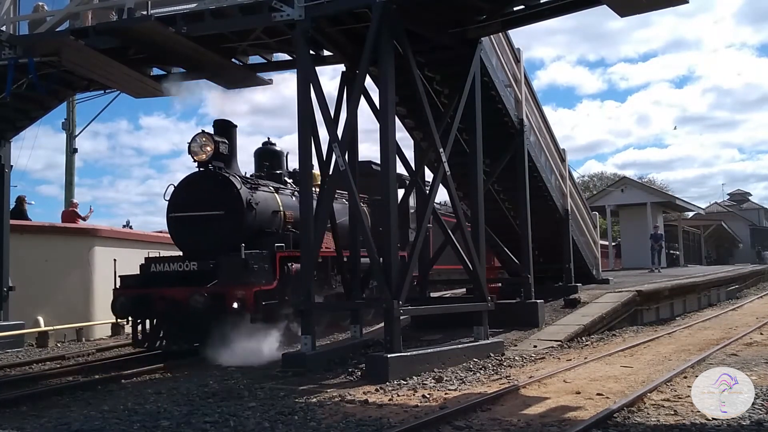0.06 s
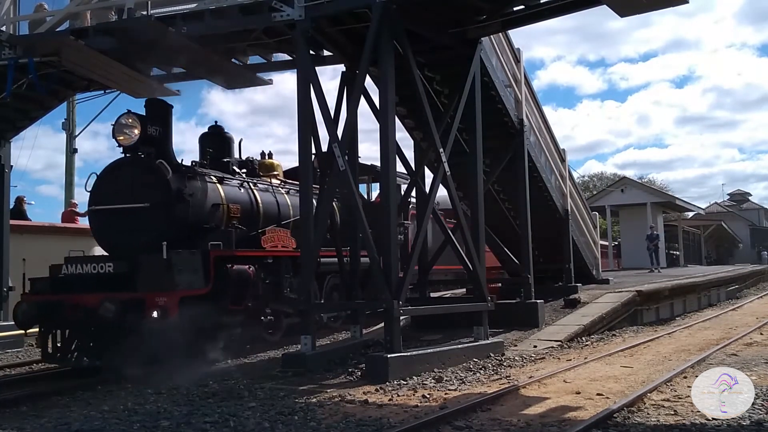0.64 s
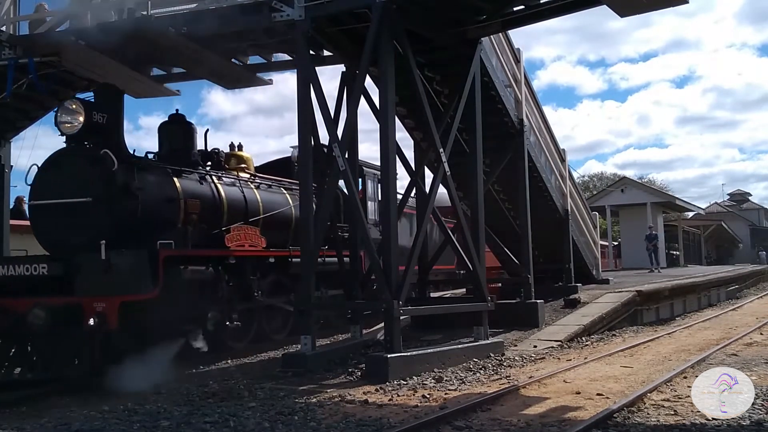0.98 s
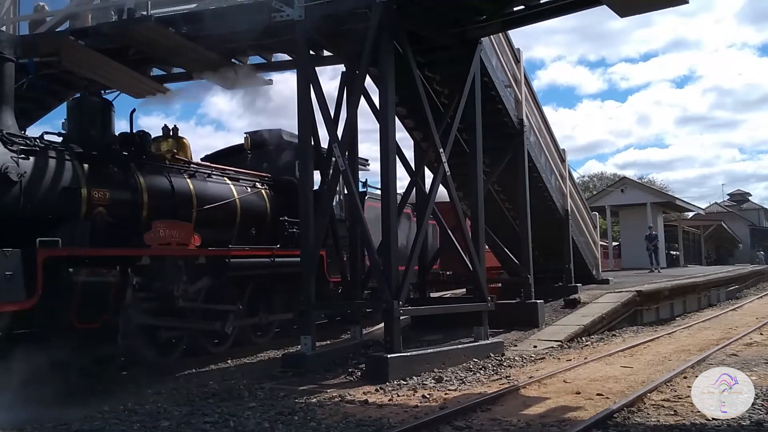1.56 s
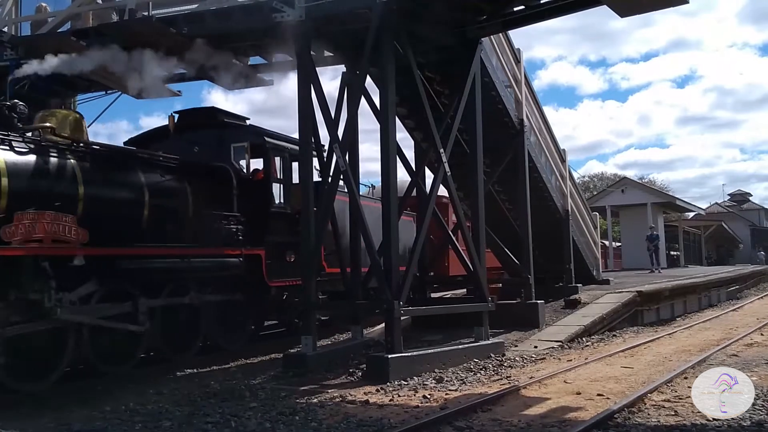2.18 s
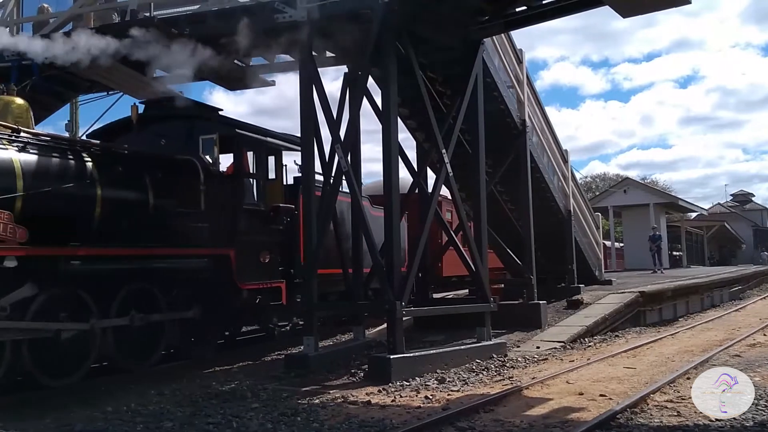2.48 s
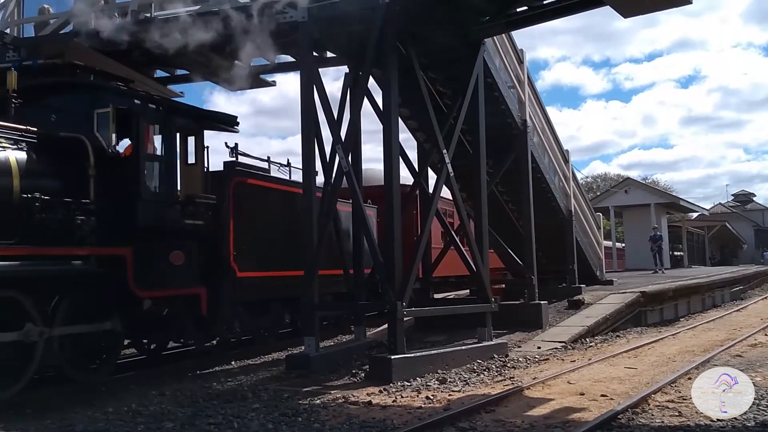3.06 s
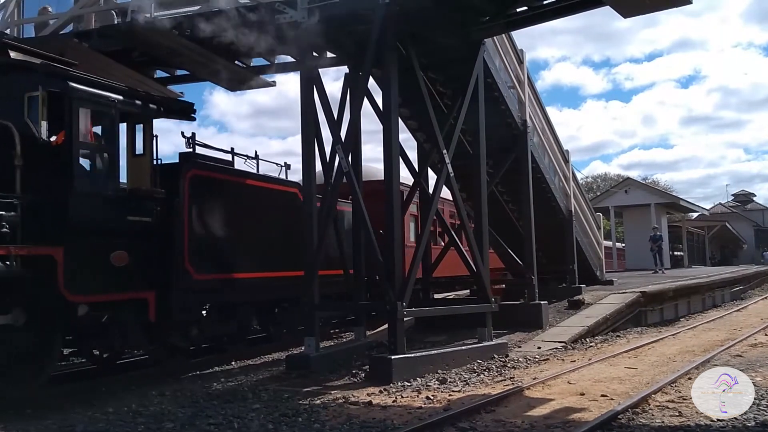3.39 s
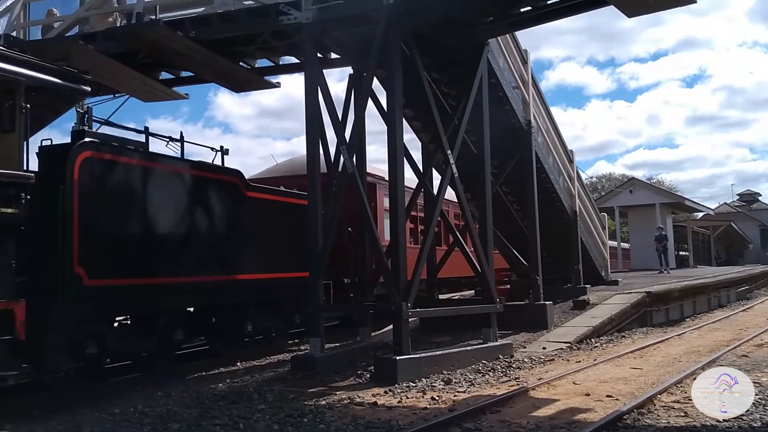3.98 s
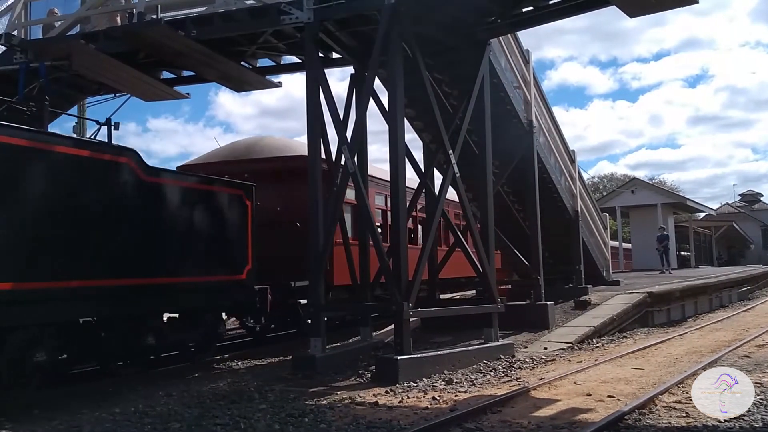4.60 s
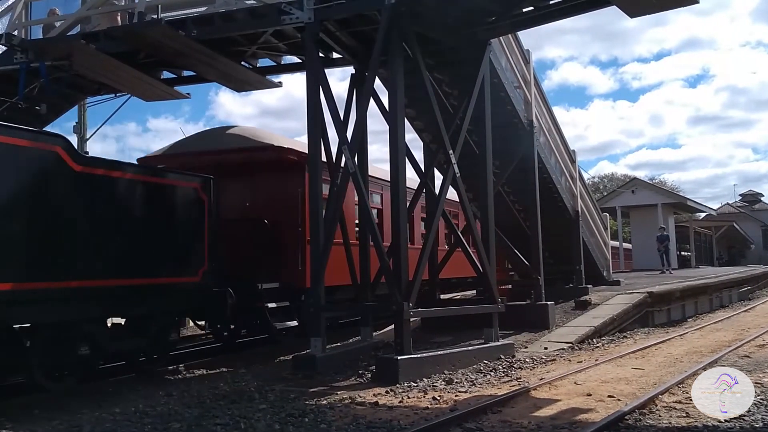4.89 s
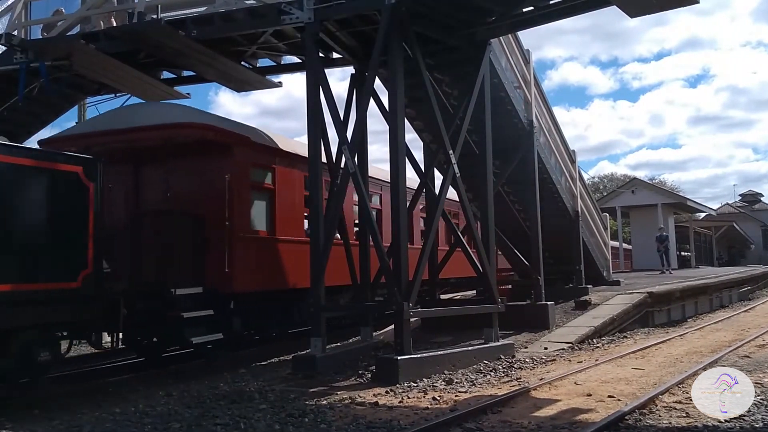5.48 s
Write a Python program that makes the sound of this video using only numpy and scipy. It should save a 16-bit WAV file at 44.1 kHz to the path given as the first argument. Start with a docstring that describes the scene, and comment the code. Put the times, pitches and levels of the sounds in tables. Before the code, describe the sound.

A steam locomotive passes close by, chuffing rhythmically with loud blasts of hissing steam, rumbling wheels and a thin high whine.

```python
"""A railway station: a steam locomotive pulls out with its carriages, passing close by.
Exhaust chuffs and hoots in the chimney four times a wheel turn; once a turn an open cylinder
drain blasts steam. The wheels rumble louder as they near and ring faintly, the turbo-generator's
whine sinks as it passes, and slack rods knock and clank. A footbridge adds a short tail to
blasts, chuffs and knocks; gain control ducks the loudest moments."""
import sys
import numpy as np
from scipy import signal
from scipy.fft import rfft, irfft, next_fast_len
from scipy.io import wavfile
from scipy.ndimage import uniform_filter1d

SR = 44100
rng = np.random.default_rng(int(sys.argv[2]) if len(sys.argv) > 2 else 0)


def bounce(signal):
    """Save signal as a 16-bit WAV file at the path given by the first command-line argument."""
    frames = np.transpose(np.atleast_2d(signal))
    limited = np.clip(frames, -1, 1)
    pcm = np.round(limited * 32767).astype(np.int16)
    wavfile.write(sys.argv[1], SR, pcm)


N = 244314
TIME = np.arange(N) / SR
EDGE_HZ = 14290
# drain blasts, one per wheel turn: level/dB, lead steam/dB, fizz/dB, fizz tilt/dB,
# ring f/Hz, ring width/Hz, ring gain/dB, hump f/Hz, dip f/Hz
BLASTS = [(-26.5, -13, -11, -3, 4760, 530, 6.5, 6400, 9100),
          (-21, -16, -10, 0.5, 4480, 470, 10, 5600, 3200), (-19.5, -16, -7, -5.5, 4460, 340, 7, 6500, 5300),
          (-18.5, -14.5, -10, -2.5, 4430, 260, 8.5, 3750, 5800),
          (-18.5, -13.5, -8.5, 5, 3520, 940, 1.5, 5940, 9300),
          (-23, -11.5, -8.5, 4, 2770, 230, 2, 5760, 8700)]


def amp(db):
    return 10 ** (np.asarray(db) / 20)


def unit_rms(x):
    return x / np.sqrt(np.mean(abs(x) ** 2) + 1e-20)


def bell(hz, centre_hz, width_hz):
    return np.exp(-((hz - centre_hz) / width_hz) ** 2)


def spectrum_db(points, hz):
    """Interpolate on a log-frequency axis."""
    f, db = np.transpose(points)
    return np.interp(np.log(hz + 1), np.log(f), db)


def follow(rows, t):
    """Table columns interpolated at times t."""
    times, *columns = np.transpose(rows)
    return [np.interp(t, times, column) for column in columns]


def add(mix, start_s, sound):
    part = mix[max(round(start_s * SR), 0):][:len(sound)]
    part += sound[:len(part)]


def noise(points, size):
    """Shaped noise, rms 1."""
    full = next_fast_len(size)
    shape = amp(spectrum_db(points, np.fft.rfftfreq(full, 1 / SR)))
    return unit_rms(irfft(rfft(rng.standard_normal(full)) * shape, full)[:size])


def drift(rate_hz, size=N):
    """Smooth random motion, rms 1."""
    full = next_fast_len(size)
    hz = np.fft.rfftfreq(full, 1 / SR)
    lowpass = np.exp(-(hz / rate_hz) ** 2) * (hz > 0)
    return unit_rms(irfft(rfft(rng.standard_normal(full)) * lowpass, full)[:size])


def crank_time(turns, start_s=-.185, turns_per_s=.8746, turns_per_s2=.0186):
    """Time at which the accelerating wheels reach a turn count."""
    return start_s + (np.sqrt(turns_per_s ** 2 + 2 * turns_per_s2 * turns) - turns_per_s) / turns_per_s2


def gone_by(t, pass_s=2.7, width_s=0.25):
    """0 as the cylinder approaches, 1 once past."""
    return .5 + .5 * np.tanh((t - pass_s) / width_s)


def pressure_db(t, turn, lead_db, lead_s=0.068, crack_s=0.043, open_s=0.015, vent_s=0.045, linger_s=0.18):
    """The valve cracks to admit lead steam and opens wide; the steam expands and is released."""
    opens, sags, release = (crank_time(turn + angle) for angle in (0, 0.31, 0.42))
    curve = [(opens - 2 * (lead_s + crack_s), -90), (opens - lead_s - crack_s, lead_db - 21.5),
             (opens - lead_s, lead_db), (opens - open_s, lead_db), (opens + open_s, 0), (sags, 0),
             (release, -10), (release + vent_s, -26), (release + vent_s + linger_s, -55)]
    return np.interp(t, *np.transpose(curve), right=-120)


def blast(turn, row, comb_hz=725, sputter_db=-0.13, sputter_hz=170):
    """Wet steam sputters through the drain cock, whose bore rings. Returns start time and sound."""
    # steam jet spectrum: f/Hz, density/dB
    jet_spectrum = [(250, -30), (850, -11.5), (1120, -2.5), (1450, 1.5), (2200, 2.46), (3000, 3.5),
                    (4100, 4.5), (5100, 0.5), (6300, 2.5), (7500, 1.5), (8800, -7), (10500, -13.5),
                    (14000, -16)]
    level_db, lead_db, fizz_db, tilt_db, ring_hz, ring_width_hz, ring_db, hump_hz, dip_hz = row
    opens_s = crank_time(turn)
    passed = gone_by(opens_s)
    start_s = max(round(opens_s - .25, 1), 0)
    t, hz = start_s + np.arange(SR) / SR, np.fft.rfftfreq(SR, 1 / SR)
    db = spectrum_db(jet_spectrum, hz) + ring_db * bell(hz, ring_hz, ring_width_hz)
    db += 2.5 * bell(hz, hump_hz, 600) - 2 * bell(hz, dip_hz, 450)
    # once past: less body, more low roar
    db += (2 - 4.5 * passed) * bell(hz, 1830, 500) + 7 * passed * bell(hz, 730, 460)
    db += np.interp(hz, [10000, EDGE_HZ], [0, tilt_db])
    # ground and frame reflections ripple the spectrum
    db += 2 * np.cos(2 * np.pi * hz / comb_hz) * bell(hz, 2 * comb_hz, 3500) * (hz > 1.25 * comb_hz)
    db += .5 * drift(90, len(hz))
    jet = rfft(rng.standard_normal(SR)) * amp(db)
    # fizz is beamed: its share depends on where the jet points
    hiss_rms = np.std(irfft(jet * (hz > 4700) * (hz < 9000)))
    fizz_rms = np.std(irfft(jet * (hz > 10000) * (hz < 14000)))
    crossfade = np.clip((hz - 7700) / 2500, 0, 1)
    steam = irfft(jet * ((1 - crossfade) / hiss_rms + amp(fizz_db) * crossfade / fizz_rms))
    envelope_db = level_db + pressure_db(t, turn, lead_db) + sputter_db * drift(sputter_hz, SR)
    return start_s, steam * amp(envelope_db)


def drain():
    """The open cylinder drain blasts once a turn."""
    out = np.zeros(N)
    for turn, row in enumerate(BLASTS):
        add(out, *blast(turn, row))
    return out


def chuffs(rasp_db=-7, waver_hz=20, flutter_db=2.2):
    """Each exhaust beat swells, holds and dies in the chimney: hollow note, rasp, unsteady hoot."""
    # beats of a turn: crank angle/turns, accent/dB, rise/s, hold/s, rasp/dB, low hoot/dB, high hoot/dB
    beats = [(-.035, 1.5, .022, .034, 4, -1, -2.5), (0.198, -.5, 0.026, 0.031, 4, -5, -10.5),
             (0.436, 0, 0.021, 0.014, 4.5, -1, -13.5), (.698, -1, 0.025, 0.043, -2, -3, -13)]
    # chimney passing by: t/s, level/dB, hollow note/dB, hoot/dB, fall/s
    exhaust = [(0, -31, 2.5, -7, 0.047), (1.6, -27.5, 1.5, -8.5, 0.047), (2.9, -23.5, -3.5, 3, 0.022),
               (3.65, -21.5, 3, -13, 0.021), (4.15, -21.5, 2.5, -7.5, 0.021),
               (5.54, -22.5, -0.5, -3, 0.028)]
    # chimney hoots: f/Hz
    hoots_hz = [283.8, 376]
    # hollow note and rasp spectra: f/Hz, density/dB
    hollow_spectrum = [(60, -50), (110, -8), (141, 9), (205, -12), (275, 2.5), (325, -5.5), (390, -2),
                       (520, -16), (800, -21.5), (2000, -49)]
    rasp_spectrum = [(200, -5), (430, -2), (650, -4), (850, -1), (1200, -6.5), (1550, -2.5), (2300, -10.5),
                     (4500, -16.5), (8000, -29), (14000, -46)]
    hollow_env, rasp_env, low_env, high_env = np.zeros((4, N))
    for turn in range(len(BLASTS)):
        for angle, accent_db, rise_s, hold_s, throat_db, low_db, high_db in beats:
            beat_s = crank_time(turn + angle)
            level_db, hollow_db, hoot_db, fall_s = follow(exhaust, beat_s)
            t = TIME - beat_s
            exponent = np.where(t < 0, (t / rise_s) ** 2, (np.maximum(t - hold_s, 0) / fall_s) ** 1.08)
            beat = amp(level_db + accent_db) * np.exp(-exponent)
            hollow_env += beat * amp(hollow_db)
            rasp_env += beat * amp(throat_db)
            low_env += beat * amp(hoot_db + low_db)
            high_env += beat * amp(hoot_db + high_db)
    phases = [2 * np.pi * np.cumsum(hz + waver_hz * drift(58.8)) / SR for hz in hoots_hz]
    low, high = (unit_rms(np.sin(phase)) for phase in phases)
    hoots = (low_env * low + high_env * high) * amp(flutter_db * drift(46))
    hollow = noise(hollow_spectrum, N)
    hollow /= np.sqrt(uniform_filter1d(hollow ** 2, size=1500) + 1e-3)  # steady push within a beat
    return hollow_env * hollow + amp(rasp_db) * rasp_env * noise(rasp_spectrum, N) + hoots


def rolling(leak_before_db=-48.5, leak_after_db=-43):
    """Wheels rumble, ironwork rattles; the glands leak steam, plainer once the cylinder is past."""
    # tender and carriages nearing: t/s, rumble/dB, clatter/dB
    approach = [(0.0, -37, -48), (0.28, -39, -46.5), (3.07, -33, -38), (3.59, -30.5, -35),
                (5.54, -24.5, -33)]
    # wheel, ironwork and gland spectra: f/Hz, density/dB
    rumble_spectrum = [(20, -42), (38, -32), (56, 1), (72, -11.5), (92, -2), (115, -13.5), (142, -3.5),
                       (190, -12), (300, -16), (600, -45.5), (1500, -53)]
    clatter_spectrum = [(150, 3.5), (300, -5.5), (450, 6), (650, 0), (950, -1), (1280, -2), (1540, 2.5),
                        (1750, -3), (2550, -7.5), (2800, -7), (3150, -10), (3700, -9), (6000, -52)]
    leak_spectrum = [(1500, 12), (3000, -29), (4350, 14), (5000, 4.5), (6400, 4.5), (8500, -2), (11000, -9),
                     (14000, -45)]
    rumble_db, clatter_db = follow(approach, TIME)
    leak_db = leak_before_db + (leak_after_db - leak_before_db) * gone_by(TIME)
    rumble = noise(rumble_spectrum, N) * amp(rumble_db + 1.2 + 1.64 * drift(rate_hz=7.3))
    clatter = noise(clatter_spectrum, N) * amp(clatter_db + 3 + 0.94 * drift(rate_hz=45))
    leak = noise(leak_spectrum, N) * amp(leak_db + .5 * drift(rate_hz=20))
    return rumble + clatter + leak


def generator(blade_hz=4101, shaft_hz=53, waver_hz=2.03, echo_db=-43):
    """Doppler-shifted turbine blade tone with shaft-rate sidebands and scattered echoes."""
    # whine: t/s, blade tone/dB, lower sideband/dB
    whine = [(0, -33.5, -48), (.6, -48, -49), (.9, -37.5, -52), (1.6, -47, -41), (2.55, -39, -44.5),
             (3.1, -42, -39), (3.6, -28.5, -53), (3.92, -40.5, -68), (4.07, -25.5, -57), (5.02, -27.5, -45),
             (5.19, -35, -50), (5.38, -21.5, -48), (5.54, -30.5, -50)]
    speed_m_per_s, sound_m_per_s, distance_m, closest_s = 3.4, 343, 6.5, 4.35
    blade_db, lower_db = follow(whine, TIME)
    ahead_m = speed_m_per_s * (closest_s - TIME)
    hz = blade_hz * (1 + speed_m_per_s / sound_m_per_s * ahead_m / np.hypot(ahead_m, distance_m))
    phase = 2 * np.pi * np.cumsum(hz + waver_hz * drift(8.1)) / SR
    shaft = np.exp(2j * np.pi * shaft_hz * TIME)
    fading = 1 + 0.62 * (drift(2.2) + 1j * drift(8))
    sidebands = (amp(lower_db) / shaft + amp(blade_db - 16) * shaft) * fading
    echoes = amp(echo_db) * unit_rms(drift(45) + 1j * drift(45))
    blade = amp(blade_db + drift(7.3))
    tone = ((blade + sidebands + echoes) * np.exp(1j * phase)).real
    octave = amp(blade_db - 41) * np.cos(2 * phase)
    return np.sqrt(2) * (tone + octave)


def wheel_ring(before_db=-17, after_db=-1, width_hz=9):
    """The rails excite the wheels' modes, plainer once the engine is alongside."""
    # wheel modes: f/Hz, level/dB
    modes = [(1475, -50.5), (1599, -45), (1820, -47), (2842, -52), (2896, -55), (3467, -51), (3580, -58)]
    ring = np.zeros(N)
    for hz, db in modes:
        excitation = drift(width_hz) + 1j * drift(width_hz)
        ring += amp(db) * unit_rms((excitation * np.exp(2j * np.pi * hz * TIME)).real)
    return ring * amp(before_db + (after_db - before_db) * gone_by(TIME))


def knocks(thump_db=-8, thump_decay_s=0.024, knock_rise_s=0.00057, clank_rise_s=0.0015):
    """Slack in rods and couplings closes with a thud; steel parts ring briefly."""
    # running-gear knocks: t/s, level/dB, f/Hz, decay/s
    thuds = [(0.712, -24.5, 139.2, 0.036), (1.578, -26, 149.5, 0.019), (1.9012, -16, 236, 0.0076),
             (2.3925, -24, 165, 0.016), (2.67, -23.5, 130, 0.025), (2.871, -15.5, 356, 0.0062),
             (3.595, -23, 149, 0.0085), (4.041, -20, 122, 0.019), (4.773, -12.5, 197, 0.0037)]
    # dull blow spectrum: f/Hz, density/dB
    thump_spectrum = [(80, -22), (180, 2), (450, 6), (700, -9), (1100, -21), (2000, -30), (4000, -36),
                      (9000, -55)]
    # rod and coupling clanks: t/s, level/dB, pitch ratio
    clanks = [(1.44, -47, 0.82), (2.54, -33, 0.97), (3.604, -25, 0.975), (4.641, -34, 0.84),
              (5.228, -31, .8), (5.46, -30, 0.68)]
    # rod modes: f/Hz, level/dB, t60/s
    rod_modes = [(1566, 10, 0.14), (1670, -31, 0.13), (1450, -21, 0.099)]
    out, t = np.zeros(N), np.arange(SR // 4) / SR
    for start_s, db, hz, decay_s in thuds:
        phase = 2 * np.pi * hz * t
        thud = (np.sin(phase) + .5 * np.sin(1.64 * phase)) * np.exp(-t / decay_s)
        thump = amp(thump_db) * noise(thump_spectrum, len(t)) * np.exp(-t / thump_decay_s)
        add(out, start_s, amp(db) * (thud + thump) * (1 - np.exp(-t / knock_rise_s)))
    for start_s, db, pitch in clanks:
        ring = sum(amp(mode_db - 60 * t / t60_s) * np.sin(2 * np.pi * (pitch * hz * t + rng.random()))
                   for hz, mode_db, t60_s in rod_modes)
        add(out, start_s, amp(db) * ring * (1 - np.exp(-t / clank_rise_s)))
    return out


def footbridge(x, wet_db=-19, t60_s=0.28, taps_per_s=2000, delay_s=.012):
    """Ironwork overhead scatters a short, faint tail."""
    t = np.arange(SR // 2) / SR
    taps = rng.standard_normal(len(t)) * (rng.random(len(t)) < taps_per_s / SR) * (t > delay_s)
    tail = taps * amp(-60 * t / t60_s)
    return x + amp(wet_db) * signal.oaconvolve(x, tail / np.linalg.norm(tail))[:N]


def gain_control(x, threshold_db=-15, ratio=7, recovery_db_per_s=45):
    """Ducks everything during a loud blast; recovers quickly."""
    power_db = 10 * np.log10(abs(uniform_filter1d((x ** 2).mean(0), size=700)) + 1e-12)
    ramp_db = TIME * recovery_db_per_s
    held_db = np.maximum.accumulate(power_db + ramp_db) - ramp_db
    over_db = np.maximum(held_db - threshold_db, 0)
    return x / amp((1 - 1 / ratio) * uniform_filter1d(over_db, size=300))


def scene():
    """The whole train, identical in both channels."""
    train = footbridge(drain() + chuffs() + knocks()) + rolling() + generator() + wheel_ring()
    return np.array([train, train])


def record(dry, low_cut_hz=39):
    """Low cut, gain control, band limit."""
    low_cut = signal.butter(4, low_cut_hz, "high", fs=SR, output="sos")
    band_limit = signal.firwin(701, EDGE_HZ, window=("kaiser", 9), fs=SR)
    return signal.oaconvolve(gain_control(signal.sosfilt(low_cut, dry)), band_limit[None], "same")


dry = scene()
out = record(dry)
bounce(out)
```